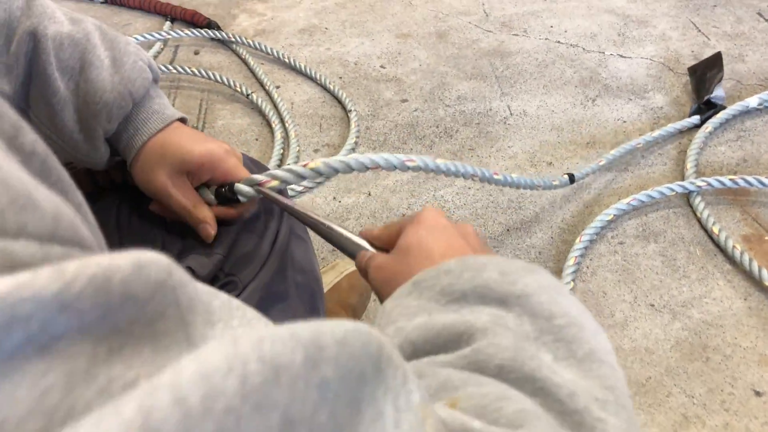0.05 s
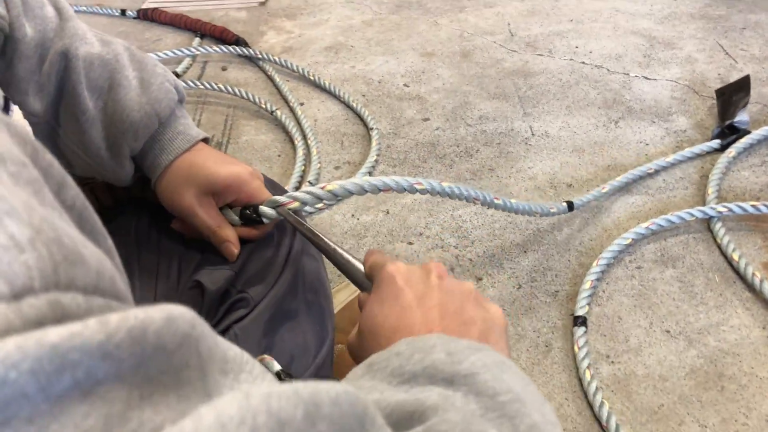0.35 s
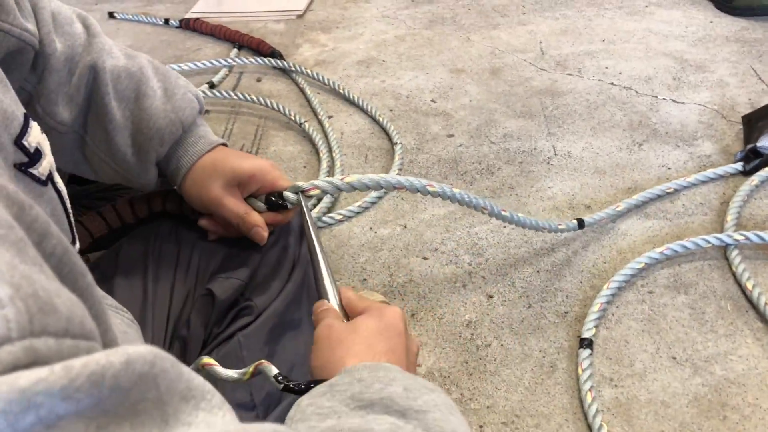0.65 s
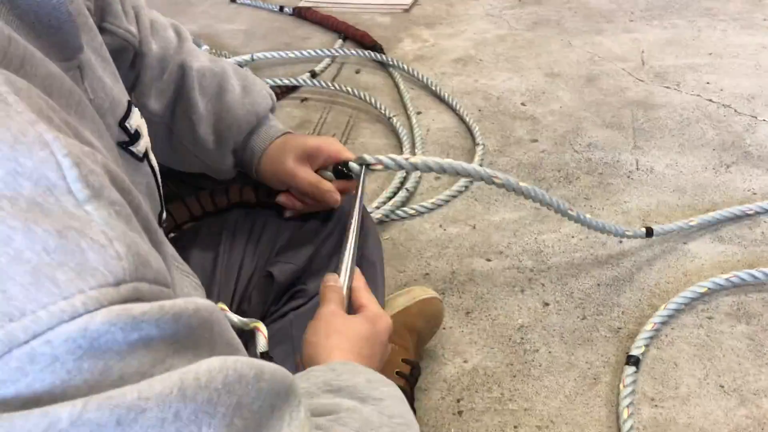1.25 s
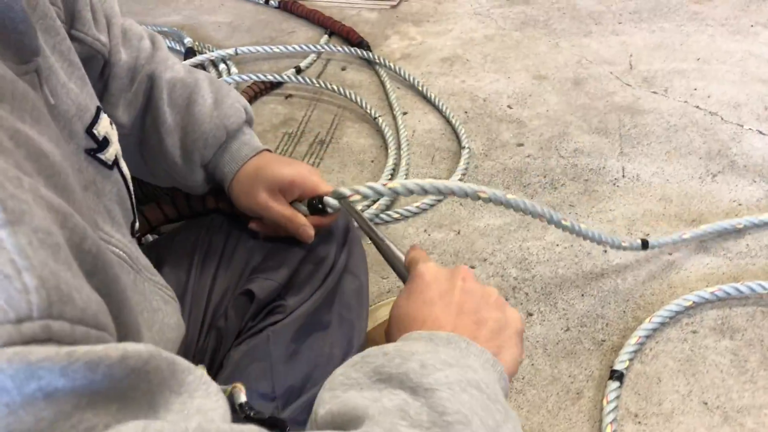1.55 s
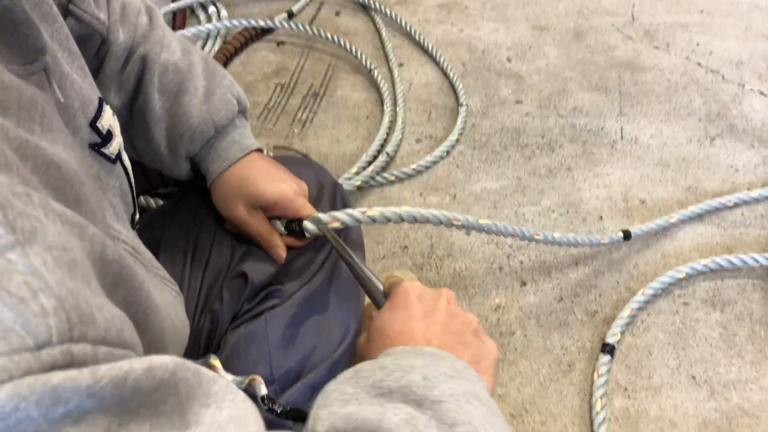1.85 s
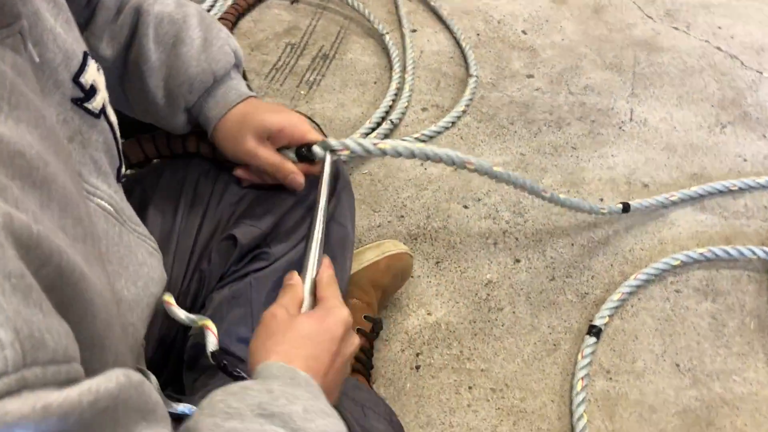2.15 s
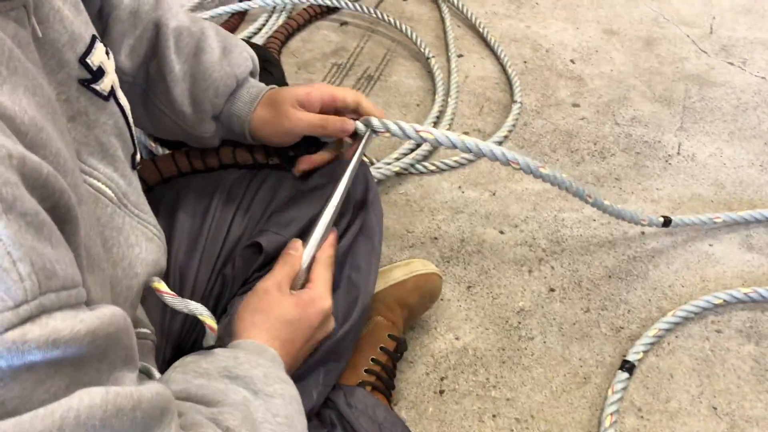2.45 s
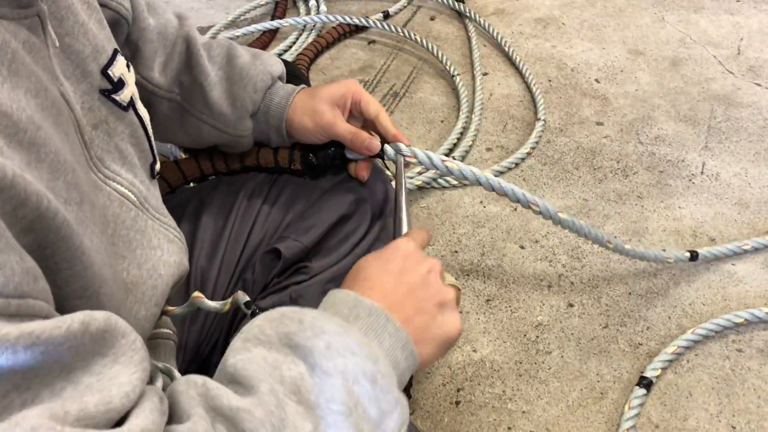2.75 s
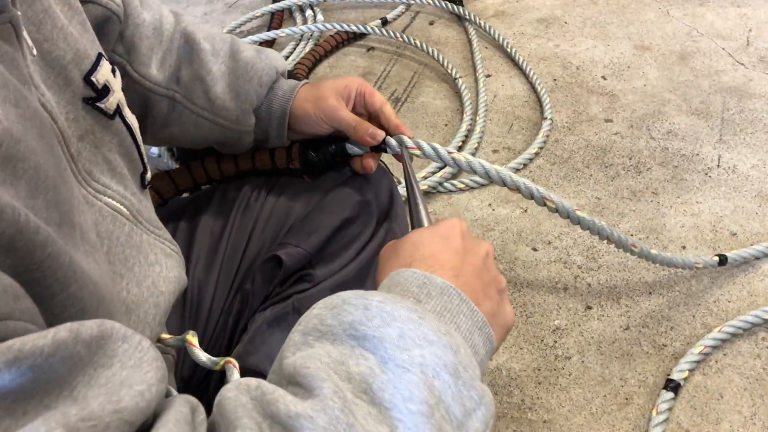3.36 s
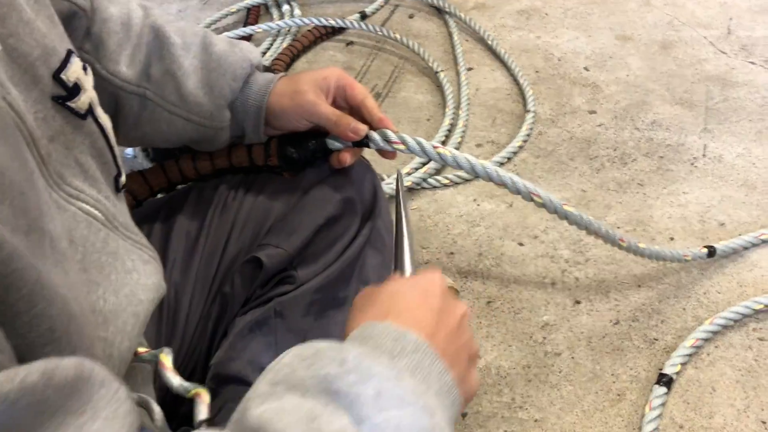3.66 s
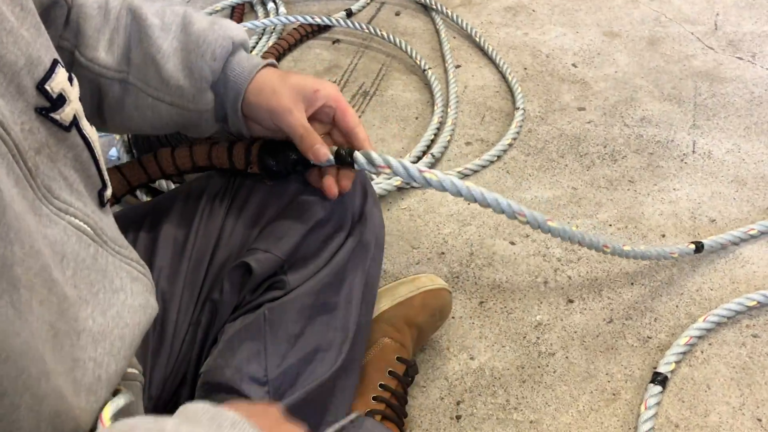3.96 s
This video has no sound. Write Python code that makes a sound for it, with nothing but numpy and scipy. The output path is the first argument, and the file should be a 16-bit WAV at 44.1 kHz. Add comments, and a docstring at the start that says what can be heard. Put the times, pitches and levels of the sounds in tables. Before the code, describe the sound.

A steel spike scrapes between rope strands close up, with small fibre snaps and swishing sleeves, while a machine hums steadily in the workshop. Rope and shoe bump the concrete floor at 1.3 seconds, then bump and scuff around 2 seconds with a slight echo. The scraping is hardest near 2.5 seconds. Around 3.8 seconds the spike slides out with a faint zip, followed by a few bumps and scuffs.

```python
"""Someone splices a twisted rope with a steel spike on a concrete workshop floor, heard close up.
A machine hums throughout. From the start, sweatshirt sleeves swish, the spike scrapes between the
strands and fibres snap. Rope and shoe bump the floor at 1.3 s, then bump and scuff it around 2 s.
The scraping is hardest near 2.5 s. Near 3.8 s the spike is drawn out with a faint zip,
and a few last bumps and scuffs follow."""
import sys
import numpy as np
from scipy import signal
from scipy.fft import rfft, irfft, next_fast_len
from scipy.io import wavfile
from scipy.ndimage import map_coordinates

SR = 44100
rng = np.random.default_rng(int(sys.argv[2]) if len(sys.argv) > 2 else 0)


def put_to_file(sound):
    """Save the sound as 16-bit audio at rate SR, in the file named by the first command-line argument."""
    columns = np.atleast_2d(sound).T  # one column per channel
    safe = np.clip(columns, -1, 1)
    whole_steps = np.round(safe * 32767)
    wavfile.write(sys.argv[1], SR, whole_steps.astype(np.int16))


N = 176400  # 4 seconds

# the machine's two tones (pitch [Hz], level [dB])
HUM_TONES = [(110.7, -54.5), (221.4, -60.5)]
# the room's low rumble (frequency [Hz], level [dB])
RUMBLE_SPECTRUM = [(20, -44), (35, -22), (50, -2), (80, -1.5), (125, 4.5), (175, -2.5), (215, 1.5),
                   (300, -7), (450, -9), (720, -14.5), (1100, -18), (2000, -22), (4000, -25.5), (8000, -30),
                   (15500, -33)]
# the room's echo; a fade time is how long a sound takes to drop 60 dB (frequency [Hz], fade time [s])
ECHO_FADES = [(150, 0.31), (800, 0.41), (4000, 0.78), (14000, 0.11)]
# sleeve strokes (start [s], length [s], rise [s], fall [s], level [dB], growth over the stroke [dB])
SLEEVE_STROKES = [(-.02, 0.067, 0.038, 0.02, -56, 2), (1.133, .17, .045, 0.058, -50, 0),
                  (1.342, 0.428, .09, 0.11, -60.5, 4), (2.03, 0.522, 0.13, 0.043, -54, 6.5),
                  (2.542, 0.13, .03, 0.16, -56.5, -0.5), (2.891, 0.079, .03, 0.046, -62, 4),
                  (3.584, 0.35, 0.13, 0.017, -52.5, 1), (3.936, .1, 0.021, .03, -45, 1.5)]
# the hiss of cloth (frequency [Hz], level [dB])
CLOTH_SPECTRUM = [(100, -17), (250, 1.5), (600, -5.5), (1200, -0.5), (2200, 0), (3500, 0.5), (6500, -1),
                  (10000, -4.5), (15500, -8.5)]
# scuffs on the floor (peak time [s], rise [s], fall [s], level [dB], pitch [Hz], width [octaves])
FLOOR_SCUFFS = [(1.874, 0.0077, 0.0082, -42, 760, 0.23), (1.884, 0.049, 0.033, -55, 970, 0.97),
                (1.88, 0.013, 0.01, -61, 2150, 0.2), (2.025, 0.0057, 0.0085, -54, 1640, 0.42),
                (3.897, 0.012, 0.019, -53, 2280, 0.16), (3.96, 0.036, 0.034, -49, 890, 1)]
# dull bumps of rope and shoe (time [s], level [dB], pitch [Hz], fade time [s])
FLOOR_BUMPS = [(.3895, -39, 780, 0.013), (1.2949, -34.5, 1110, 0.019), (1.2977, -31, 663, 0.02),
               (1.2985, -32, 294, 0.023), (1.328, -42, 700, 0.0099), (1.694, -44.5, 233, .06),
               (1.868, -43, 1040, 0.025), (1.888, -34, 345, 0.031), (2.0177, -28.5, 504, .022),
               (2.0346, -38.5, 1750, 0.013), (2.037, -30.5, 217, 0.061), (2.04, -39, 288, 0.028),
               (3.29, -46.5, 790, .015), (3.342, -46, 755, 0.014), (3.915, -33, 320, 0.031),
               (3.926, -37.5, 120, 0.056), (3.976, -40.5, 120, 0.076)]
# fibre snaps and ticks of the spike (time [s], level [dB], pitch [Hz], fade time [s])
SNAPS = [(0.0416, -47, 7000, 0.0074), (0.3777, -24.5, 9900, 0.0018), (.4495, -51.5, 5360, 0.022),
         (.565, -37.5, 3300, .008), (.5655, -41, 8440, 0.015), (.642, -46, 8000, 0.016),
         (0.86, -60, 4500, .008), (1.2974, -42.5, 2780, 0.011), (1.357, -46.5, 14000, .008),
         (1.4473, -40.5, 11000, 0.0077), (1.532, -46, 5970, .008), (1.581, -51.5, 11000, 0.043),
         (1.826, -46, 6000, .008), (2.462, -38.5, 3260, 0.014), (2.505, -39, 4500, 0.007),
         (2.6006, -44, 3300, .008), (2.778, -39, 3400, 0.0054), (2.9127, -52, 7000, .008),
         (2.936, -55, 11000, 0.0071), (2.958, -42.5, 5200, 0.0066)]
# the tones of the hand-held spike (pitch [Hz], level [dB], fade time [s])
STEEL_TONES = [(2814, -5, 0.21), (3140, -11, 0.42), (3455, 0.5, 0.18), (7040, -10, .15)]
# the spike forcing strands apart (peak time [s], rise [s], fall [s], level [dB])
SPIKE_PUSHES = [(.57, 0.01, .016, -58), (.635, .015, 0.011, -57.5), (1.302, .007, 0.013, -53),
                (1.715, 0.018, 0.02, -56), (2.44, .03, .025, -54.5), (2.52, 0.017, 0.012, -48.5),
                (2.61, .04, 0.044, -62)]
# spike and hands dragging on the rope (peak time [s], rise [s], fall [s], level [dB])
ROPE_DRAGS = [(.03, 0.057, .06, -57), (.358, 0.017, .012, -63), (.475, 0.021, 0.025, -60),
              (.545, 0.029, 0.053, -56.5), (.568, 0.017, 0.027, -55), (.635, 0.016, 0.022, -56),
              (.755, 0.075, 0.024, -62.5), (.85, 0.06, 0.055, -58), (1.02, 0.039, .025, -64),
              (1.16, .06, 0.045, -58.5), (1.47, 0.053, .05, -58), (1.586, 0.034, .04, -55.5),
              (1.713, 0.024, 0.02, -51), (1.755, .02, 0.022, -56), (1.878, 0.093, 0.029, -56.5),
              (2.024, 0.01, 0.084, -58.5), (2.21, 0.023, .05, -56.5), (2.44, 0.1, 0.037, -50.5),
              (2.52, 0.025, 0.04, -50.5), (2.635, .04, 0.085, -55.5), (2.775, 0.032, 0.02, -56),
              (2.855, 0.058, 0.074, -58.5), (2.955, .025, 0.0084, -59.5), (3.18, 0.066, 0.057, -69),
              (3.35, 0.056, 0.026, -63.5), (3.47, 0.065, 0.029, -65.5)]
# the sound of rubbed rope (frequency [Hz], level [dB])
ROPE_SPECTRUM = [(150, -25), (500, -2.5), (1000, -2), (1800, -1.5), (2350, -5), (2850, -3.5), (3900, -3.5),
                 (6000, -5), (9000, -11), (15500, -15.5)]


def gain(db):
    """Turn decibels into a number to multiply by."""
    return 10 ** (np.asarray(db) / 20)


def normalise(x):
    """Scale a sound to an average (rms) size of 1."""
    return x / np.sqrt(np.mean(x ** 2) + 1e-20)


def look_up(points, hz):
    """Read between the rows of a (frequency, value) table, on a log frequency scale."""
    freqs, values = np.transpose(points)
    return np.interp(np.log(hz + 1), np.log(freqs + 1), values)


def filtered(x, response):
    """Multiply each frequency in a sound by response(hz)."""
    size = next_fast_len(len(x) + 4096)
    return irfft(rfft(x, size) * response(np.fft.rfftfreq(size, 1 / SR)), size)[:len(x)]


def coloured(x, spectrum):
    """Shape a sound's bass and treble with a table, then normalise it."""
    return normalise(filtered(x, lambda hz: gain(look_up(spectrum, hz))))


def band(x, centre_hz, octaves):
    """Keep mostly the frequencies around one pitch."""
    return filtered(x, lambda hz: 1 / (1 + (np.log2((hz + 1) / centre_hz) / octaves) ** 2))


def wobble(per_s):
    """A smooth curve through per_s random values a second."""
    values = rng.standard_normal(int(N * per_s / SR) + 4)
    return map_coordinates(values, [np.arange(N) * per_s / SR])


def clicks(per_s, spread_db):
    """Tiny clicks at random times and of random size."""
    hits = (rng.random(N) < per_s / SR) * rng.choice([-1, 1], N)
    sizes = gain(spread_db * np.clip(rng.standard_normal(N), -2, 2))
    return normalise(hits * sizes)


def swell(peak_s, rise_s, fall_s):
    """A rounded rise and fall."""
    t = np.arange(N) / SR - peak_s
    return np.exp(-0.5 * (t / np.where(t < 0, rise_s, fall_s)) ** 2)


def machine_hum():
    """A machine hums on one note and its octave, over the rumble of the room."""
    t, hum = np.arange(N) / SR, np.zeros(N)
    for hz, db in HUM_TONES:
        height = np.sqrt(2) * gain(db + 0.2 * wobble(3.67))
        hum += height * np.sin(2 * np.pi * (hz * t + rng.random()) + 0.033 * wobble(2.45))
    return hum + gain(-57) * coloured(rng.standard_normal(N), RUMBLE_SPECTRUM)


def room_echo(x):
    """The workshop's echo lasts longest near 4 kHz; the highest treble dies first."""
    hz, t, noise = signal.stft(rng.standard_normal(SR // 2), SR, nperseg=256)
    fade = gain(-60 * t / look_up(ECHO_FADES, hz)[:, None])
    tail = signal.istft(noise * fade, SR, nperseg=256)[1]
    delayed = np.pad(tail, (SR // 300, 0)) / np.linalg.norm(tail)
    return signal.fftconvolve(x, delayed)[:N]


def sleeve_swishes():
    """Cloth slides on cloth: a fine hiss that follows each arm stroke."""
    t, power = np.arange(N) / SR, np.zeros(N)
    for start, length, rise, fall, db, growth_db in SLEEVE_STROKES:
        fade_in = np.clip((t - start) / rise, 0, 1)
        fade_out = np.exp(-2 * np.maximum(t - start - length, 0) / fall)
        progress = np.clip((t - start) / length, 0, 1)
        power += (fade_in * fade_out * gain(db + growth_db * progress)) ** 2
    flutter = gain(0.76 * wobble(40))
    return np.sqrt(power) * flutter * coloured(rng.standard_normal(N), CLOTH_SPECTRUM)


def floor_scuffs():
    """Rope and shoe stick and slip on the floor; each scuff rings around one pitch."""
    out = np.zeros(N)
    for peak, rise, fall, db, hz, octaves in FLOOR_SCUFFS:
        slips = clicks(per_s=900, spread_db=0.5)
        out += gain(db) * swell(peak, rise, fall) * normalise(band(slips, hz, octaves))
    return out


def floor_bumps(rise_s=0.00061, thud_db=-11):
    """Rope and shoe land softly: a quickly fading tone over a noisy thud."""
    out, t = np.zeros(N), np.arange(SR // 8) / SR
    for start, db, hz, fade_s in FLOOR_BUMPS:
        shape = gain(-60 * t / fade_s) * (1 - np.exp(-t / rise_s))
        tone = shape * np.sin(2 * np.pi * hz * t)
        thud = shape * band(rng.standard_normal(len(t)), hz, octaves=0.82)
        thud *= np.linalg.norm(shape) / np.linalg.norm(thud)
        mix_in(out, start, gain(db) * (tone + gain(thud_db) * thud))
    return out


def mix_in(track, start_s, sound):
    """Add a short sound to a track at a given time."""
    part = track[max(0, round(start_s * SR)):][:len(sound)]
    part += sound[:len(part)]


def spike_zip(peak_s=3.78, half_length_s=0.2, top_hz=1923, roughness=1.8):
    """Ribbed surfaces slide as the spike is drawn out; the pitch rises and falls with the arm's speed."""
    t = np.arange(N) / SR
    speed = np.clip(1 - ((t - peak_s) / half_length_s) ** 2, 0, 1)
    phase = 2 * np.pi * np.cumsum(top_hz * speed) / SR
    tone = np.sin(phase + roughness * wobble(350))
    octave = gain(-10) * np.sin(2 * phase + roughness * wobble(350))
    return gain(-62.5) * speed * normalise(tone + octave)


def fibre_snaps(octaves=0.93):
    """Fibres snap and the spike ticks: sharp bursts of noise with hardly any ring."""
    out, t = np.zeros(N), np.arange(SR // 40) / SR
    lead = SR // 500  # 2 ms of space for the filter to spread into
    for start, db, hz, fade_s in SNAPS:
        fade = gain(-60 * t / fade_s)
        burst = np.pad(rng.standard_normal(len(t)) * fade, (lead, 0))
        snap = band(band(burst, hz, octaves), hz, octaves)
        snap *= np.linalg.norm(fade) / np.linalg.norm(snap)
        mix_in(out, start - lead / SR, gain(db) * snap)
    return out


def steel_ring(rubbing):
    """Rubbing makes the spike ring, and the hand holding it soon stops the ring."""
    t = np.arange(SR // 4) / SR
    ring = sum(gain(db - 60 * t / fade_s) * np.sin(2 * np.pi * hz * t) for hz, db, fade_s in STEEL_TONES)
    return signal.fftconvolve(rubbing, ring / np.linalg.norm(ring))[:N]


def rope_scrapes(crackle_share=0.51):
    """Fibres catch and slip under the spike: crackle over hiss, and a rasp as strands are forced apart."""
    drag = np.sqrt(sum((gain(db) * swell(*timing)) ** 2 for *timing, db in ROPE_DRAGS))
    push = sum(gain(db) * swell(*timing) for *timing, db in SPIKE_PUSHES)
    crackle = np.sqrt(crackle_share) * clicks(per_s=2500, spread_db=8.5)
    rubbing = crackle + np.sqrt(1 - crackle_share) * rng.standard_normal(N)
    slips = clicks(per_s=1600, spread_db=3.5)
    rasp = push * normalise(band(slips, centre_hz=2900, octaves=0.28))
    scrape = drag * gain(1.3 * wobble(90)) * coloured(rubbing, ROPE_SPECTRUM)
    return scrape + rasp + gain(-16) * steel_ring((drag + push) * rubbing)


def scene():
    """Handwork close by, the floor further off with more echo; left and right are the same."""
    snaps = fibre_snaps()
    floor = floor_bumps() + floor_scuffs()
    handwork = sleeve_swishes() + spike_zip() + rope_scrapes() + snaps
    echo = room_echo(gain(-7) * floor + gain(-16) * snaps)
    mono = machine_hum() + echo + floor + handwork
    return np.array([mono, mono])


def record(dry):
    """Cut away the very highest treble, above 15.9 kHz."""
    return np.array([filtered(channel, lambda hz: hz < 15900) for channel in dry])


dry = scene()
out = record(dry)
put_to_file(out)
```